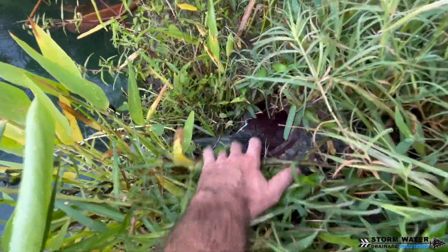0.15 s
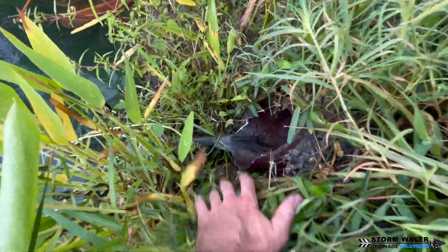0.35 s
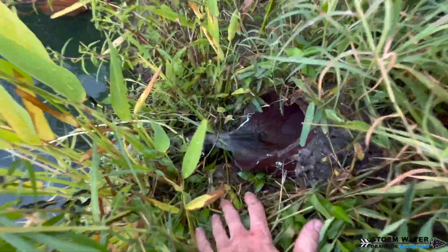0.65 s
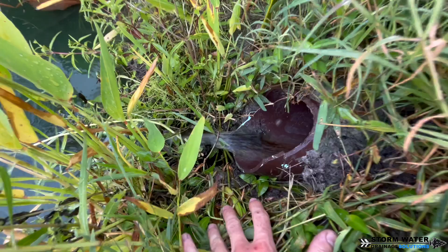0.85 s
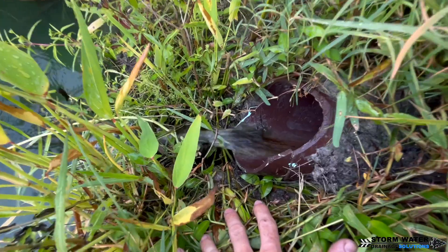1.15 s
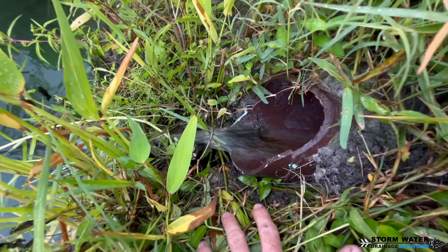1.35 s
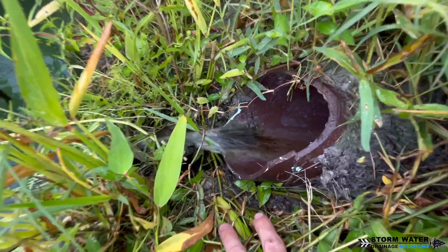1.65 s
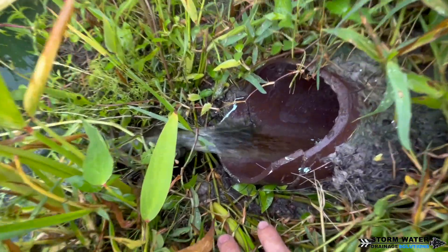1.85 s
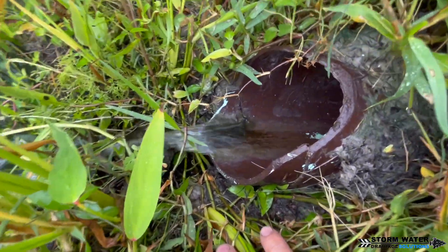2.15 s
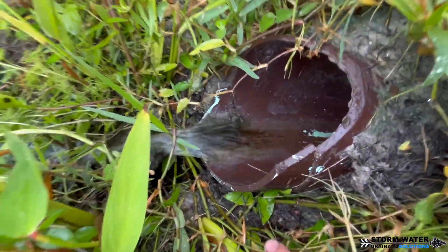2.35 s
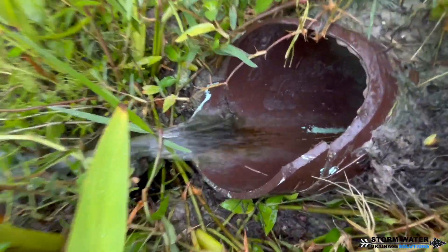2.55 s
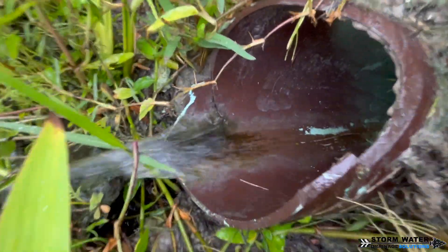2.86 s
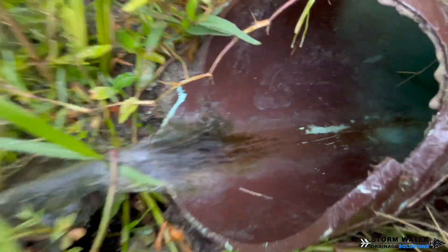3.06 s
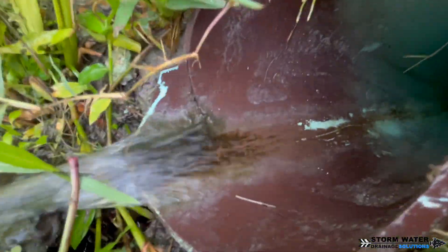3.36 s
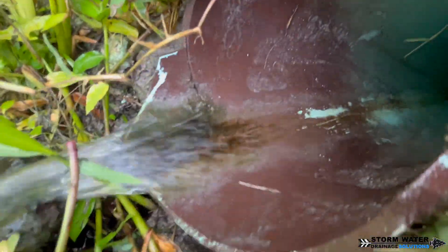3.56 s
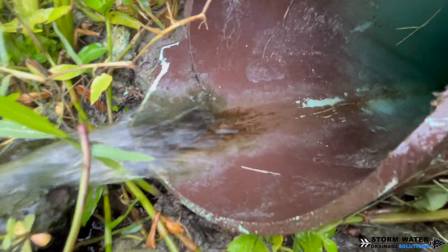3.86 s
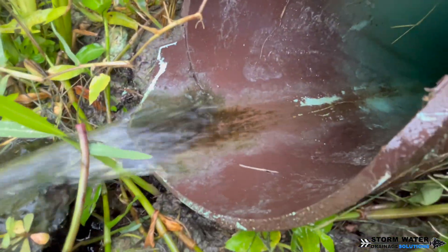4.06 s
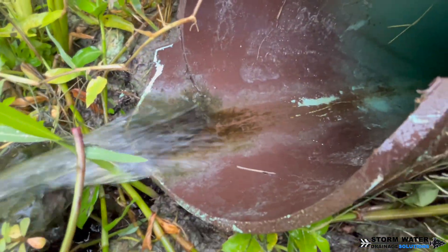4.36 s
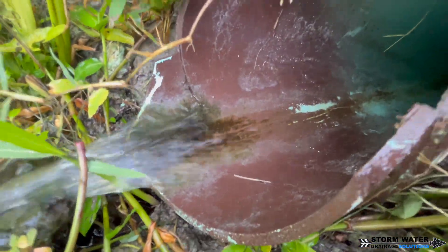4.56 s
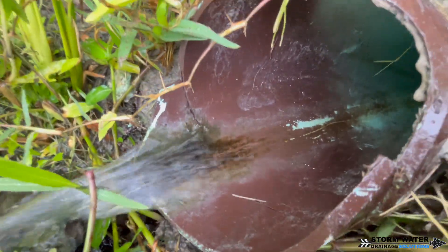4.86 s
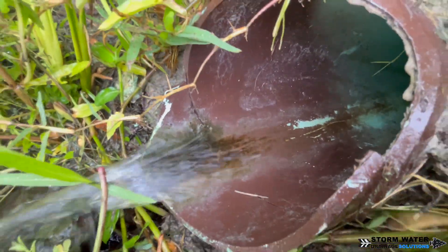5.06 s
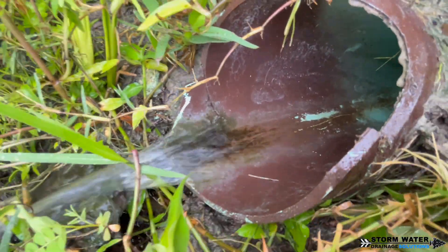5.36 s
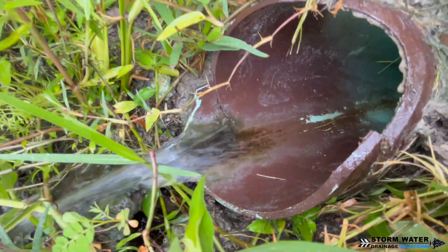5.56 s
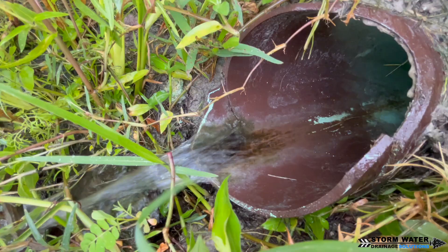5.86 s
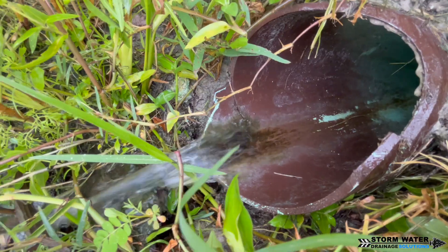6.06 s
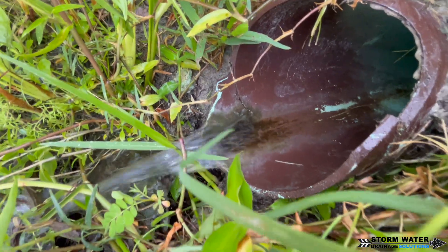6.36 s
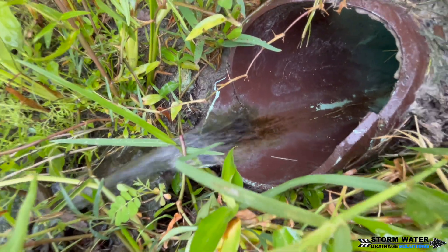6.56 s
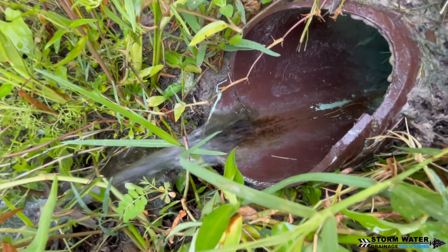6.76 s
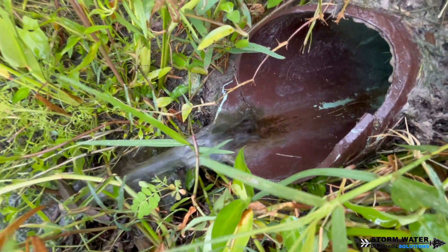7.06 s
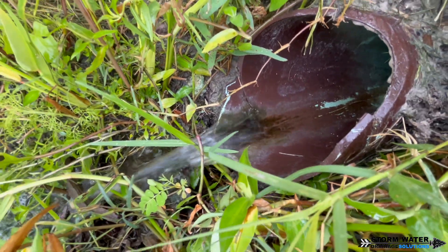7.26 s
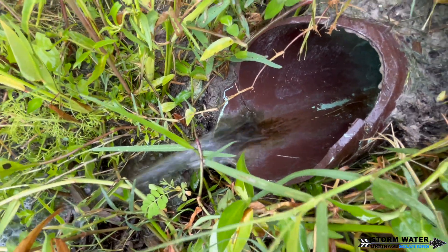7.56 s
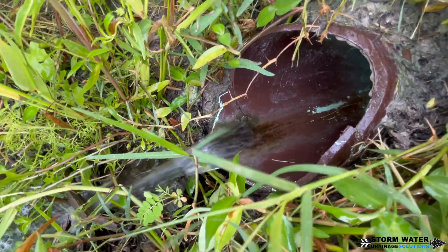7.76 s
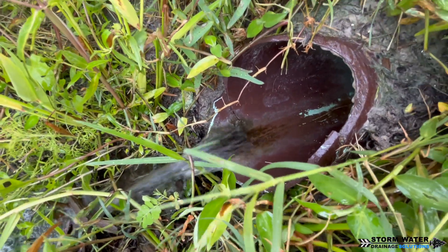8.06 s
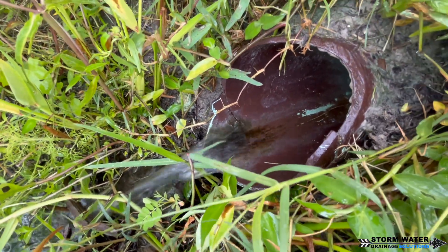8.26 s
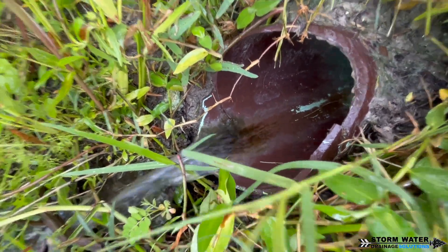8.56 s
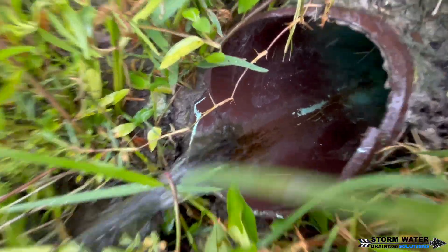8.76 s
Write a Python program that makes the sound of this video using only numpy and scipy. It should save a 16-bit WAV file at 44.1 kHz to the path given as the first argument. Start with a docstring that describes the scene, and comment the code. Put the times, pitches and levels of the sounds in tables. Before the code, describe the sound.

Rain runoff spills steadily from a wide drain pipe through grass into a pond, heard close from above in stereo. Bright fizz and spatter dominate, with irregular hollow plops and tiny ringing bubbles. The stream grows louder as the microphone nears the pipe, then eases slightly. Grass snaps and squeaks briefly near the middle; a low, uneven rumble swells afterwards.

```python
"""A fizzing, spattering stream is heard first: rain water leaves a wide drain pipe and falls through grass to a pond.
The microphone is close above; it nears the pipe and draws back. Tiny ringing bubbles and droplet clicks
make the stream, trapped air pockets plop and gurgle below the lip, and small bubbles sound brief rising notes.
Shaped noise bursts make the spatters and dry grass snaps; one run of snaps hides a squeaking blade of grass.
A low, uneven rumble of filtered noise, with a few soft thumps, lies underneath and swells in the second half."""
import sys
import numpy as np
from scipy import signal
from scipy.fft import rfft, irfft, next_fast_len
from scipy.io import wavfile

SR = 44100
rng = np.random.default_rng(int(sys.argv[2]) if len(sys.argv) > 2 else 0)


def put_to_file(sound):
    """Save the sound as 16-bit audio at rate SR, in the file named by the first command-line argument."""
    columns = np.atleast_2d(sound).T  # one column per channel
    safe = np.clip(columns, -1, 1)
    whole_steps = np.round(safe * 32767)
    wavfile.write(sys.argv[1], SR, whole_steps.astype(np.int16))


N = 392490


def from_db(db):
    """Decibels to gain."""
    return 10 ** (np.asarray(db) / 20)


def rms_one(x):
    """Scale to unit power."""
    return x / np.sqrt(np.mean(x ** 2) + 1e-20)


def in_time(rows):
    """Each column of a curve at every sample."""
    s, *columns = np.transpose(rows)
    return [np.interp(np.arange(N) / SR, s, column) for column in columns]


def at_hz(points, hz):
    """Read a table on a log-frequency axis."""
    f, value = np.transpose(points)
    return np.interp(np.log(np.maximum(hz, 1)), np.log(f), value)


def filtered(x, response):
    """Pass x through a response given as a function of Hz."""
    size = next_fast_len(N + 4096, True)
    hz = np.arange(size // 2 + 1) * SR / size
    return irfft(rfft(x, size) * response(hz), size)[..., :N]


def band(x, low_hz, high_hz, order=2):
    """Causal band-pass, its edges kept below the top of the spectrum."""
    top = .47 * SR
    edges = [min(low_hz, .75 * top), min(high_hz, top)]
    return signal.sosfilt(signal.butter(order, edges, "band", fs=SR, output="sos"), x + 1e-18)


def drift(rate_hz):
    """Slow random wandering with spread 1: noise through a double pole, on every 40th sample."""
    r = np.exp(-80 * np.pi * rate_hz / SR)
    noise = rng.standard_normal(N // 40 + 2002)
    slow = signal.lfilter([1], [1, -2 * r, r * r], noise)[2000:]   # the filter has settled by here
    return np.interp(np.arange(N) / 40, np.arange(len(slow)), rms_one(slow))


def ring(clicks, hz, t60):
    """A unit click sets a sine ringing, which falls 60 dB in t60 seconds."""
    r, w = np.exp(-np.log(1000) / (t60 * SR)), 2 * np.pi * hz / SR
    return signal.lfilter([0, np.sin(w)], [1, -2 * r * np.cos(w), r * r], clicks + 1e-18)


def grains(per_s, spread_db, largest=4.7, count=24000):
    """Clicks of either sign at random moments, many small and a few large."""
    when, luck, size, sign = rng.random((count, 4)).T
    at = (when * N).astype(int)
    born = luck * count < np.broadcast_to(per_s, N)[at] * N / SR
    size = np.minimum(-np.log(1 - size), largest)
    return np.bincount(at, born * np.sign(sign - .5) * from_db(spread_db * size), N)


def strays(per_s, level_db, hz, scatter_db, octaves, count=64):
    """Small events at random moments, scattered about a level and a pitch: rows (time [s], level [dB], pitch [Hz])."""
    when, luck = rng.random((count, 2)).T
    size, pitch = np.clip(rng.standard_normal((count, 2)), -2, 2).T
    level = np.broadcast_to(level_db, N)[(when * N).astype(int)] + scatter_db * size
    rows = np.transpose([when * N / SR, level, hz * 2 ** (octaves * pitch)])
    return rows[:int(per_s * N / SR)]


def panned(left_db):
    """Left and right gains of constant power, for a left minus right difference in dB."""
    gains = from_db(np.array([[.5], [-.5]]) * left_db)
    return gains / np.sqrt(np.mean(gains ** 2, axis=0))


def add(out, s, sound):
    """Mix a short sound in at a given time."""
    at = max(0, round(s * SR))
    out[..., at:at + sound.shape[-1]] += sound[..., :N - at]


def bubble(hz, cycles, rise, t):
    """A bubble rings down 60 dB over some cycles; its pitch rises as it nears the surface."""
    age = t * hz / cycles
    tone = np.sin(2 * np.pi * hz * t * (1 + rise * np.minimum(age, 1) / 2))
    return tone * np.exp(-np.log(1000) * age) * (1 - np.exp(-2 * t * hz))


def swarm(per_s, low_hz, high_hz, cycles, rise, spread_db, largest, count=4000):
    """Bubbles born at random moments, each with its own size, pitch and ringing time."""
    rows = rng.random((count, 5))
    at = (rows[:, 0] * N).astype(int)
    born = rows[:, 1] * count < np.broadcast_to(per_s, N)[at] * N / SR
    size, pitch, life = rows[born, 2:].T[..., None]
    step = np.arange(int(.7 * SR * cycles / low_hz))
    notes = bubble(low_hz * (high_hz / low_hz) ** pitch, cycles * 2 ** (life - .5), rise, step / SR)
    notes = notes * from_db(spread_db * np.minimum(-np.log(1 - size), largest))
    return np.bincount((at[born, None] + step).ravel(), notes.ravel(), N)[:N]


# how alike left and right are at each pitch: (frequency [Hz], likeness [0-1])
SIDE_LIKENESS = [(500, 0.78), (1100, 0.78), (1700, 0.28), (2800, 0.42), (4000, 0.35), (4750, 1),
                 (5150, 0.95), (5700, 0.39), (7800, 0.64), (8600, 1), (11800, 1), (13200, 0.75),
                 (14600, 0.5)]


def spread(pair):
    """Two unrelated sounds are mixed into left and right, with a set likeness at each pitch."""
    alike = lambda f: np.clip(at_hz(SIDE_LIKENESS, f), 0, .99)
    mid = filtered(pair[0], lambda f: np.sqrt((1 + alike(f)) / 2))
    side = filtered(pair[1], lambda f: np.sqrt((1 - alike(f)) / 2))
    return np.array([mid + side, mid - side])


# relative colour of the bubbles and spray close by: (frequency [Hz], density [dB per Hz])
STREAM_COLOUR = [(1300, -0.5), (1700, -1.5), (2400, 0.5), (3100, 0.5), (3600, -3), (4300, 1), (5100, 2.5),
                 (6300, -1.5), (7500, -3.5), (10000, -6), (12500, -8), (14500, -10.5), (16000, -13.5)]


def splash(bubbles_db, spray_db, cycles=62.0, rise=0.04, bubbles_per_s=20, bubble_db=-5.5, fizz_db=-2.5,
           drop_db=-13.5, smack_db=-13.5, hiss_db=-1.5, surge_db=0.77, patchy_db=1.8):
    """Tiny bubbles ring at their own pitch, droplets click across all bands, and the finest spray blurs into hiss."""
    surge = drift(24)
    crowd = from_db(1.8 * surge)   # the stream breaks up in clumps
    drops = np.array([rms_one(grains(700 * crowd, spread_db=4.5, largest=5.8)) for _ in range(2)])
    hiss = from_db(hiss_db) * rng.standard_normal((2, 2, N))
    edges = np.geomspace(1250, 16500, 15)
    low, high = np.zeros((2, N)), np.zeros((2, N))
    for k, (lo, hi) in enumerate(zip(edges, edges[1:])):
        hz = np.sqrt(lo * hi)
        fine = hz > 4200
        clicks = np.roll(drops, 7 * k, axis=1)   # each band gets the droplets 7 samples later
        wash = hiss[k % 2] + from_db(smack_db if fine else drop_db) * clicks
        births = crowd * (bubbles_per_s * hz / 2500)   # more bubbles at higher pitch
        rings = np.array([swarm(births, lo, hi, cycles, rise, spread_db=3.0, largest=3.0) for _ in range(2)])
        water = rms_one(band(wash, lo, hi)) + from_db(fizz_db if fine else bubble_db) * rms_one(rings)
        layer = high if fine else low
        layer += np.sqrt(hi - lo) * from_db(patchy_db * drift(28.0)) * water
    low, high = filtered(np.array([low, high]), lambda f: from_db(at_hz(STREAM_COLOUR, f)))
    low, high = rms_one(band(low, 720, 8800, order=1)), rms_one(high)
    return from_db(surge_db * surge) * (from_db(bubbles_db) * low + from_db(spray_db) * high)


# how hard the stream churns the pond, before the gurgle's own gain: (time [s], level [dB])
POND_CHURN = [(0.0, -50), (0.52, -48.5), (3.44, -49), (4.29, -52.5), (4.61, -47), (7.73, -47.5),
              (8.01, -48.5), (8.9, -45)]
# relative loudness of gurgling bubbles by pitch: (frequency [Hz], level [dB])
GURGLE_COLOUR = [(400, -8), (470, -7), (530, -0.5), (660, -3.5), (850, -1.5), (1050, -3.5), (1300, -6)]
# resonances of the hollow where the stream lands: (frequency [Hz], relative level [dB], 60 dB decay time [s])
LANDING_HOLLOW = [(535, 0.5, 0.013), (837, 3.5, 0.011), (1067, 2, 0.017), (1287, -1, 0.0085)]


def gurgle(gain_db=4, per_s=6, cycles=23, rise=0.061, churn_db=-2.5, knock_db=-10, wash_db=-7.0):
    """Air dragged under makes overlapping bubbles of many sizes; small impacts knock on the hollow over a dull wash."""
    rings, churn = 0, rng.standard_normal((2, 2, N))
    edges = np.geomspace(390, 1300, 9)
    for k, (lo, hi) in enumerate(zip(edges, edges[1:])):
        burble = np.array([rms_one(swarm(per_s, lo, hi, cycles, rise, spread_db=2.0, largest=1.95, count=1000))
                           for _ in range(2)])
        burble = burble + from_db(churn_db) * rms_one(band(churn[k % 2], lo, hi))
        rings = rings + from_db(at_hz(GURGLE_COLOUR, np.sqrt(lo * hi))) * burble
    knocks = np.array([grains(60, spread_db=0.5, largest=5.9, count=2000) for _ in range(2)])
    hollow = 0
    for k, (hz, mode_db, t60) in enumerate(LANDING_HOLLOW):
        hollow = hollow + (-1) ** k * from_db(mode_db) * ring(knocks, hz, t60)   # neighbours in opposite sign
    water = rms_one(band(rms_one(rings) + from_db(knock_db) * rms_one(hollow), 215, 2100))
    wash = rms_one(band(churn[0], 126, 322))
    level_db, = in_time(POND_CHURN)
    return from_db(level_db + gain_db) * (water + from_db(wash_db) * wash)


# the rumble swells and sinks in two parts: (time [s], deep part [dB], upper part [dB])
RUMBLE_SWELL = [(0.0, -52, -54.5), (0.45, -48, -48.5), (1.2, -49, -50), (2.15, -40, -46), (2.55, -52, -54),
                (3.6, -56, -65), (4.15, -49.5, -49.5), (4.5, -41, -33.5), (4.72, -42, -31.5),
                (4.85, -40, -36), (5.05, -43.5, -40), (5.65, -40, -45), (5.83, -33.5, -38.5),
                (5.99, -27, -37.5), (6.06, -28, -44), (6.13, -28, -37), (6.28, -35, -41),
                (6.39, -27.5, -33), (6.45, -34.5, -40), (6.57, -21, -42), (6.625, -29, -37),
                (6.67, -20.5, -37), (6.74, -30, -37), (6.8, -25.5, -39), (6.9, -34, -42.5),
                (7.02, -30.5, -36), (7.2, -36.5, -41.5), (8.6, -38.5, -40.5), (8.71, -27.5, -43),
                (8.78, -39, -37), (8.9, -30.5, -37)]
# relative colour of the rumble: (frequency [Hz], density [dB per Hz])
RUMBLE_COLOUR = [(20, -26), (32, -28), (48, -5), (75, 0.5), (87, -3), (101, 1.5), (116, -1), (140, -4),
                 (200, -11.5), (300, -25), (420, -42), (900, -70.5)]
# how unlike the two sides are: (frequency [Hz], side over mid [dB])
RUMBLE_WIDTH = [(35, 11), (60, -15.5), (95, -16), (180, -18), (300, -10)]
# which side the rumble leans to: (time [s], left minus right [dB])
RUMBLE_LEAN = [(0, -1.5), (0.9, 0), (1.25, -1.5), (1.7, -3), (2.5, -12.5), (4.2, 0), (8.2, -1), (8.9, -5)]


def rumble(split_hz=100, gust_db=0.15, gusts_hz=8.4):
    """Low buffeting noise, most alike on both sides around its peak; its deep and upper parts swell on their own."""
    out = 0
    deep_db, upper_db = in_time(RUMBLE_SWELL)
    for level_db, slope in ((deep_db, 1), (upper_db, -1)):   # below the split, then above it
        colour = lambda f: from_db(at_hz(RUMBLE_COLOUR, f)) / np.sqrt(1 + ((f + 1) / split_hz) ** (10 * slope))
        mid, side = rms_one(filtered(rng.standard_normal((2, N)), colour))
        side = filtered(side, lambda f: from_db(at_hz(RUMBLE_WIDTH, f)))
        both = mid + side * np.array([[1], [-1]])
        out = out + from_db(level_db + gust_db * drift(gusts_hz)) * both
    return out * panned(in_time(RUMBLE_LEAN)[0])


# dry snaps, a quick run and a few lone ones: (time [s], level over the first 2 ms [dB], centre [Hz])
GRASS_SNAPS = [(0.0315, -38, 11000), (0.0896, -32, 7200), (4.433, -32.5, 10400), (4.8071, -20.5, 6060),
               (4.816, -30, 7000), (4.8285, -29, 7500), (4.8362, -30, 7000), (4.8467, -21, 7600),
               (4.8524, -36, 7400), (4.8828, -27, 6170), (4.912, -29, 5700), (4.916, -35, 8100),
               (5.4738, -31.5, 7030), (5.879, -25.5, 11800), (5.9574, -39, 8550), (6.0902, -36, 8700),
               (7.8962, -30, 11800), (7.918, -34, 13000)]


def crackle(decay_s=0.00086, width=1.2, crumbs_db=-26.0, crumbs_s=0.032, crumbs_per_s=1500):
    """Dry snaps, as of brushed grass stems, each trailing finer ticks."""
    out, t = np.zeros((2, N)), np.arange(SR // 16) / SR
    for s, level_db, hz in GRASS_SNAPS:
        ticks = rng.random(len(t)) < crumbs_per_s / SR
        crumbs = from_db(crumbs_db) * rms_one(ticks * 1.0) * np.exp(-t / crumbs_s)
        shape = np.exp(-t / decay_s) + crumbs
        snap = band(shape * rng.standard_normal((2, len(t))), hz / width, hz * width, order=1)
        strength = snap[:, :SR // 500].std(axis=1, keepdims=True)
        add(out, s, from_db(level_db) * snap / strength)
    return out


# the sharpest spatters, before the common gain below; the rows at 5.879, 5.9572, 7.8964 and 7.9179 s # thicken
# the grass snaps at those moments: (time [s], peak level [dB], centre [Hz])
SHARP_SPATTERS = [(0.088, -30, 7300), (1.0112, -21.5, 2960), (1.3314, -27, 4600), (1.3827, -24, 9100),
                  (1.4086, -23, 7260), (1.5274, -27, 4320), (1.8677, -22.5, 3040), (1.9996, -19, 4370),
                  (2.06, -18, 4200), (2.0754, -23, 4000), (2.213, -28, 4300), (2.278, -23, 4300),
                  (3.4235, -23, 6850), (4.4179, -17, 5230), (4.492, -17.5, 4450), (4.7134, -31, 7050),
                  (4.7584, -26, 10500), (5.879, -21, 11600), (5.9572, -17.5, 8500), (7.3232, -21, 5100),
                  (7.8964, -33, 11300), (7.9179, -32, 13000)]
SPATTER_DB = -13.5   # first 5 ms of a spatter against its peak
# lighter ones come at random; level in dB over the stream, before the same gain
SMALL_SPATTERS_PER_S, SMALL_SPATTER_DB, SMALL_SPATTER_HZ = 2.9, 8, 4600


def spatters(stream_db, decay_s=0.00089, width=1.1, scatter_db=-21.5, scatter_s=0.032):
    """A flung drop smacks on a leaf or on the water and scatters into finer droplets; the same bursts also
    thicken a few late grass snaps."""
    out, t = np.zeros((2, N)), np.arange(SR // 25) / SR
    shape = np.exp(-t / decay_s) + from_db(scatter_db) * np.exp(-t / scatter_s)
    small = strays(SMALL_SPATTERS_PER_S, stream_db + SMALL_SPATTER_DB, SMALL_SPATTER_HZ, scatter_db=7.0, octaves=0.31)
    for s, peak_db, hz in [*SHARP_SPATTERS, *small]:
        burst = band(shape * rng.standard_normal((2, len(t))), hz / width, hz * width, order=1)
        strength = burst[:, :SR // 200].std(axis=1, keepdims=True)
        add(out, s, from_db(peak_db + SPATTER_DB) * burst / strength)
    return out


def plop(hz, start, decay_s, attack_s=0.00069, settle_s=0.0015):
    """The note of an air pocket: it swells, and its pitch slides to rest as the cavity opens."""
    t = np.arange(SR // 16) / SR
    pitch = hz * (1 + (start - 1) * np.exp(-t / settle_s))
    swell = (1 - np.exp(-t / attack_s)) ** 2 * np.exp(-t / decay_s)
    return np.sin(2 * np.pi * np.cumsum(pitch) / SR) * swell / swell.max()


# the loudest plops below the lip, before the common gain; hard ones sweep down and die at once, gentle ones ring:
# (time [s], peak level [dB], settled pitch [Hz], first over settled pitch [ratio], decay [s], left minus right [dB])
LOUD_PLOPS = [(0.2239, -29.5, 630, 1.67, 0.0051, -3), (0.3352, -18.5, 410, 2.6, 0.0011, -12),
              (0.5019, -26, 410, 2.56, 0.0015, -4), (0.6812, -26, 410, 3.3, 0.0012, -13),
              (0.7044, -18, 497, 1.4, 0.0037, -1), (0.9368, -29.5, 410, 2.3, 0.0021, -10),
              (0.9787, -28, 466, 3.3, 0.0023, -6), (1.0119, -12, 405, 2.9, 0.0015, -11),
              (1.0168, -27, 563, 1.1, 0.0027, -7), (1.3599, -30, 430, 3.6, 0.0021, -10),
              (1.4963, -25.5, 537, 1.43, 0.0062, -2), (1.6401, -29, 410, 3.5, 0.0019, -9),
              (1.868, -24, 405, 2.5, 0.0015, -16), (2.0194, -24.5, 950, 1.26, 0.004, -1),
              (2.0536, -24.5, 410, 2.2, 0.0012, -2), (2.0613, -24, 570, 1.16, 0.0031, -6),
              (2.0757, -20.0, 450, 2.9, 0.0012, -9), (2.1477, -23, 470, 2.6, 0.0015, -12),
              (2.2368, -30.5, 440, 1.9, 0.006, -11), (2.5102, -19.5, 880, 0.87, 0.00077, -6),
              (2.6608, -27, 508, 0.8, 0.0068, -2), (2.7869, -30.5, 570, 0.8, 0.0041, -2),
              (2.9933, -24.5, 1090, 0.85, 0.0012, -5), (3.0181, -24.5, 760, 0.68, 0.0013, -5),
              (3.3777, -27.5, 472, 1.26, 0.0089, -2), (3.4367, -27, 408, 3, 0.0017, -2),
              (3.798, -27, 477, 1.6, 0.0059, 1), (3.8258, -23.5, 670, 1.9, 0.00092, 2),
              (3.8565, -32, 470, 3.4, 0.0028, 0), (4.2458, -20.5, 860, 0.9, 0.0019, -4),
              (4.5271, -28.5, 940, 0.8, 0.0036, -8), (4.7576, -30, 480, 0.99, 0.0082, -2),
              (4.8456, -22.5, 496, 1.36, 0.0059, -2), (5.0139, -25.5, 890, 0.83, 0.0011, -8),
              (5.0648, -21.5, 410, 3, 0.0019, -8), (5.2099, -19, 825, 1.0, 0.0011, -5),
              (5.2155, -21.5, 1110, 0.93, 0.0015, 0), (5.2435, -25.5, 560, 2.2, 0.0083, -3),
              (5.3572, -9, 440, 3.75, 0.0021, -9), (5.3731, -30, 810, 0.94, 0.0016, -11),
              (5.4378, -35, 780, 1.7, 0.0065, -10), (5.4645, -33, 770, 0.8, 0.009, -9),
              (5.618, -28, 1040, 1.6, 0.00096, 2), (5.7457, -30, 540, 1.4, 0.006, -1),
              (5.8795, -20, 534, 1.4, 0.0026, -2), (5.939, -32.5, 560, 2.0, 0.0089, -1),
              (6.0022, -27.5, 447, 1.55, 0.0025, 1), (6.0882, -32.5, 510, 1.56, 0.006, -2),
              (6.2316, -31, 475, 1.66, 0.0065, -3), (6.4049, -25.5, 543, 0.99, 0.0048, -1),
              (6.4563, -20.5, 774, 1.1, 0.0013, -10), (6.7163, -30.5, 530, 1.4, 0.0067, -1),
              (6.7805, -26, 670, 1, 0.0028, -1), (6.8335, -17.5, 740, 1.6, 0.0011, -8),
              (6.8508, -28, 440, 2.6, 0.0013, -10), (7.3666, -27.5, 540, 1.6, 0.0064, -1),
              (7.5126, -16, 490, 2.1, 0.0029, -2), (7.6363, -29.5, 580, 1.5, 0.0029, -1),
              (7.7038, -30, 1080, 0.69, 0.00093, 0), (7.7184, -27.5, 543, 0.72, 0.0037, -2),
              (7.916, -26, 490, 2.3, 0.0023, -2), (8.3167, -29, 820, 2.1, 0.0012, -3),
              (8.4941, -25, 478, 1.3, 0.0085, -5), (8.6068, -26, 410, 2.6, 0.0024, -12),
              (8.7535, -22.5, 404, 1.4, 0.0015, -7), (8.8193, -29, 440, 0.73, 0.0031, -7),
              (8.8444, -33, 456, 1.9, 0.0028, -7)]
PLOP_DB = -0.5   # common gain of all plops
# softer ones come at random
SMALL_PLOPS_PER_S, SMALL_PLOP_DB, SMALL_PLOP_HZ, SMALL_PLOP_DECAY_S = 3.0, -36, 588, 0.0048
# each loud plop sheds a smaller bubble: middling delay, relative level, pitch ratio
AFTER_PLOP_S, AFTER_PLOP_DB, AFTER_PLOP_PITCH = 0.02, -19.5, 1.154


def plops(snap_db=-36.0, snap_s=0.00052):
    """A lump of water smacks the surface and opens an air pocket that rings; a smaller bubble follows."""
    out = np.zeros((2, N))
    shed = []
    for s, peak_db, hz, *_ in LOUD_PLOPS:
        later = s + AFTER_PLOP_S * rng.uniform(0.55, 1.5)
        shed.append((later, peak_db + AFTER_PLOP_DB, hz * AFTER_PLOP_PITCH))
    small = strays(SMALL_PLOPS_PER_S, SMALL_PLOP_DB, SMALL_PLOP_HZ, scatter_db=0.5, octaves=0.32)
    soft = [(*row, 1, SMALL_PLOP_DECAY_S, -3.0) for row in [*shed, *small]]   # steady pitch, a little to the right
    for s, peak_db, pitch_hz, start, decay_s, left_db in [*LOUD_PLOPS, *soft]:
        note = plop(pitch_hz, start, decay_s)
        fade = np.exp(-np.arange(len(note)) / SR / snap_s)
        snap = band(rng.standard_normal(len(note)) * fade, 1500, 6000, order=1)
        add(out, s, from_db(peak_db + PLOP_DB) * (note + from_db(snap_db) * snap) * panned(left_db))
    return out


# the clearest small bubbles that ring out, before the common gain:
# (time [s], peak level [dB], pitch [Hz], 60 dB decay time [s], left minus right [dB])
CLEAR_BLIPS = [(0.407, -33, 2120, 0.025, -3), (0.5224, -32, 1630, 0.05, -7), (1.5729, -25, 4434, 0.014, 1),
               (2.5497, -21.5, 3230, 0.017, -8), (3.1236, -25, 4046, 0.016, -7),
               (3.6693, -27.5, 2930, 0.027, -15), (3.8702, -28, 2500, 0.028, 10),
               (4.193, -23, 2400, 0.018, 11), (4.331, -24, 3830, 0.014, 4), (5.278, -27.5, 2500, 0.017, 18),
               (5.6181, -32, 1619, 0.014, 1), (5.7966, -26, 3740, 0.016, 4), (5.8929, -26, 4560, 0.014, 3),
               (6.3275, -23, 2030, 0.017, -1), (7.7036, -27, 2857, 0.011, 0),
               (7.7947, -30, 2080, 0.024, -2), (8.3168, -40, 1960, 0.011, -3),
               (8.7503, -29.5, 2350, 0.014, 2)]
BLIP_DB = 1   # common gain of all blips
# fainter ones come at random; level in dB over the stream, before the same gain
SMALL_BLIPS_PER_S, SMALL_BLIP_DB, SMALL_BLIP_HZ = 2.8, 2, 2640


def blips(stream_db, t60=0.022, rise=0.039):
    """Small bubbles pinch off at the surface, each with a brief rising note."""
    out, t = np.zeros((2, N)), np.arange(SR // 16) / SR
    small = strays(SMALL_BLIPS_PER_S, stream_db + SMALL_BLIP_DB, SMALL_BLIP_HZ, scatter_db=1.0, octaves=0.28)
    small = [(*row, t60, rng.normal(0, 5.9)) for row in small]
    for s, peak_db, hz, ring_s, left_db in [*CLEAR_BLIPS, *small]:
        add(out, s, from_db(peak_db + BLIP_DB) * bubble(hz, hz * ring_s, rise, t) * panned(left_db))
    return out


# soft low bumps in the rumble: (time [s], peak level of the swing [dB], pitch [Hz])
SOFT_THUMPS = [(1.831, -33, 68.3), (2.067, -31, 59.2), (2.738, -30, 68), (3.051, -31.5, 69.6),
               (3.271, -38, 67.3)]


def thumps(swell_s=0.0073, tap_db=0.0):
    """A dull ringing tap, then a couple of slow swings, far to the right."""
    out, t = np.zeros((2, N)), np.arange(SR // 6) / SR
    for s, peak_db, hz in SOFT_THUMPS:
        swell = (t / swell_s / 2) ** 2 * np.exp(2 - t / swell_s)
        swing = np.sin(2 * np.pi * hz * t) * swell
        tap = ring(1.0 * (t == 0), 206, 0.027)
        add(out, s, from_db(peak_db) * (swing + from_db(tap_db) * tap) * panned(-17.0))
    return out


# a blade of grass scrapes and squeaks under the run of snaps: (time [s], level [dB], pitch [Hz])
GRASS_SLIDE = [(4.785, -90, 8850), (4.795, -50, 9000), (4.815, -45, 9500), (4.84, -44, 7580),
               (4.86, -38, 8400), (4.868, -45, 8660), (4.9, -90, 8750)]


def slide(width_hz=700, rough_db=2.5, scratch_db=4.0, slips_per_s=2000):
    """The blade sticks and slips: a run of broad scratches around a rough, narrow squeak."""
    level_db, hz = in_time(GRASS_SLIDE)
    grain = rms_one(filtered(rng.standard_normal((2, N)), lambda f: 1 / (1 + (f / width_hz) ** 2)))
    turn = 2 * np.pi * np.cumsum(hz) / SR
    squeak = grain[0] * np.cos(turn) + grain[1] * np.sin(turn)   # slow noise carried up to the pitch
    slips = np.array([grains(slips_per_s, spread_db=3.0) for _ in range(2)])
    scratch = rms_one(band(slips, 3300, 7500))
    return from_db(level_db + rough_db * drift(120)) * (squeak + from_db(scratch_db) * spread(scratch))


# phase between left and right at each pitch, left leading where positive: (frequency [Hz], phase [rad])
SIDE_PHASE = [(120, 0), (350, 1.1), (520, 1.2), (1000, 2.1), (2000, 4.2), (2700, 3.4), (4200, 3.6),
              (4750, 3.2), (5100, 3.05), (5700, 2.2), (7000, 2.0), (8000, 1.0), (8400, 0), (12000, 0),
              (13200, -0.7), (14300, -1.2), (16000, -2.7)]


def phase_between_sides(pair):
    """Turn the phase of the right side against the left by a set angle at each pitch."""
    left, right = pair
    right = filtered(right, lambda f: np.exp(-1j * at_hz(SIDE_PHASE, f)))
    return np.array([left, right])


# loudness of the stream as the microphone nears the pipe and draws back: (time [s], level [dB])
PIPE_NEARNESS = [(0.0, -47), (1.16, -46.5), (3.0, -42.5), (4.39, -42.5), (5.01, -40.5), (5.28, -42),
                 (7.51, -43.5), (8.5, -44), (8.9, -41.5)]
SPRAY_DB, BUBBLES_DB = 2, -0.5   # over the stream's level
BUBBLES_FOLLOW = 1.16   # the small bubbles swing a little wider than the stream


def scene():
    """The stream grows as the microphone nears the pipe; its two sides differ in phase, the rumble lies under both."""
    stream_db, = in_time(PIPE_NEARNESS)
    middle_db = stream_db.mean()
    bubbles_db = middle_db + BUBBLES_FOLLOW * (stream_db - middle_db) + BUBBLES_DB
    surface = spread(splash(bubbles_db, stream_db + SPRAY_DB) + crackle() + spatters(stream_db))
    below = spread(gurgle()) * panned(-1.6)
    low = rumble() + thumps()
    water = surface + below + plops() + blips(stream_db) + slide()
    return phase_between_sides(water) + low


def record(dry):
    """The top is cut steeply above 15.8 kHz."""
    return signal.sosfilt(signal.ellip(10, .1, 80, 15800, fs=SR, output="sos"), dry)


dry = scene()
out = record(dry)
put_to_file(out)
```